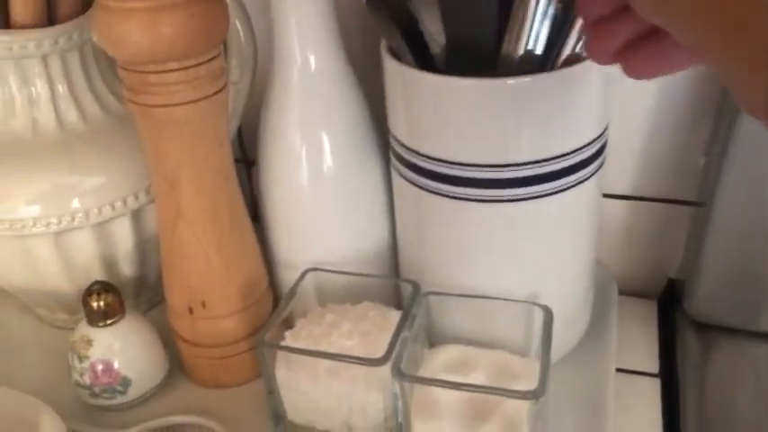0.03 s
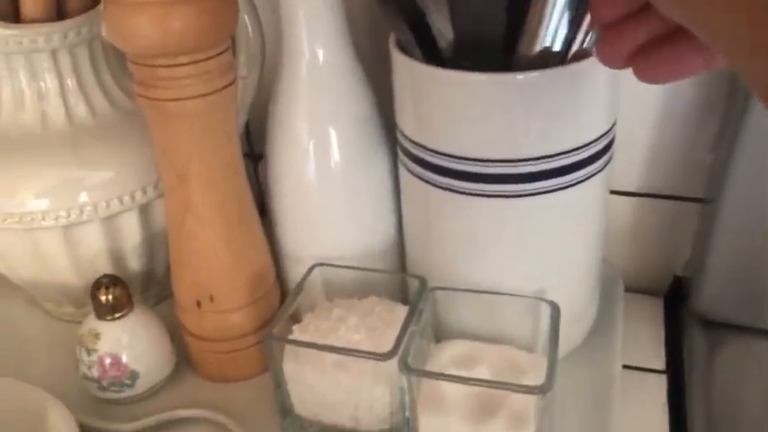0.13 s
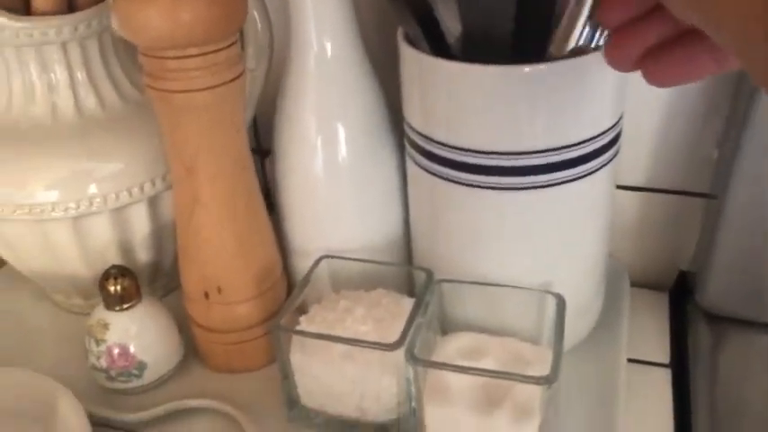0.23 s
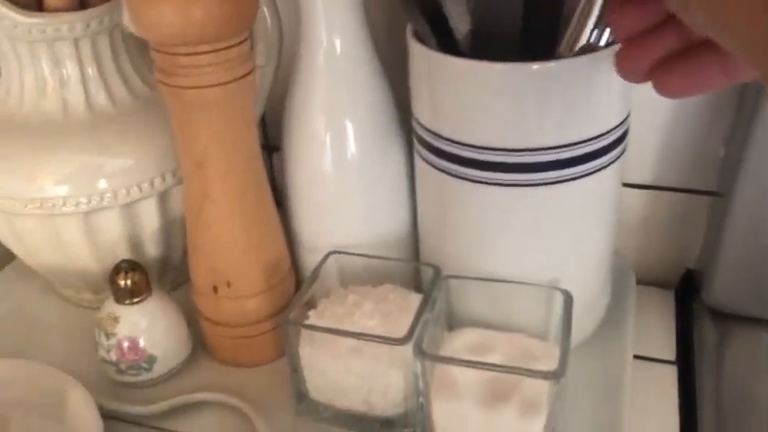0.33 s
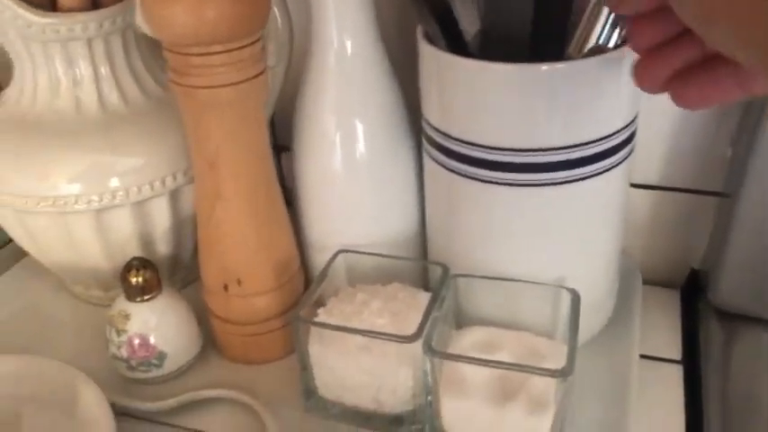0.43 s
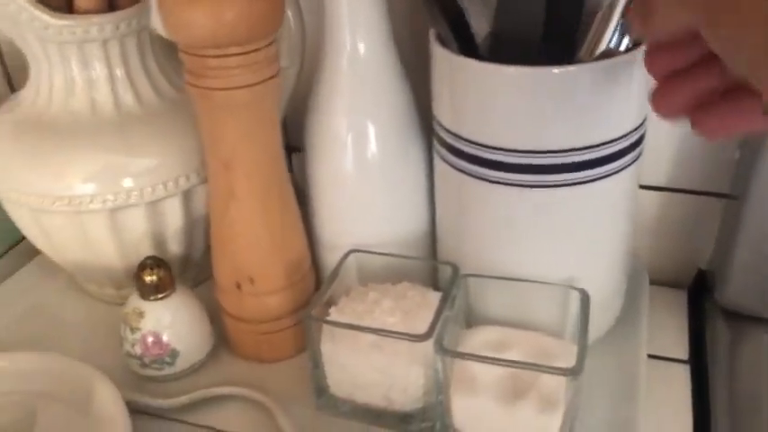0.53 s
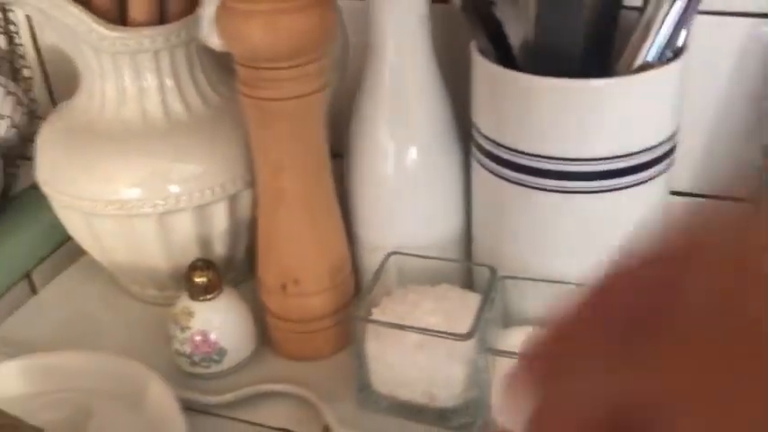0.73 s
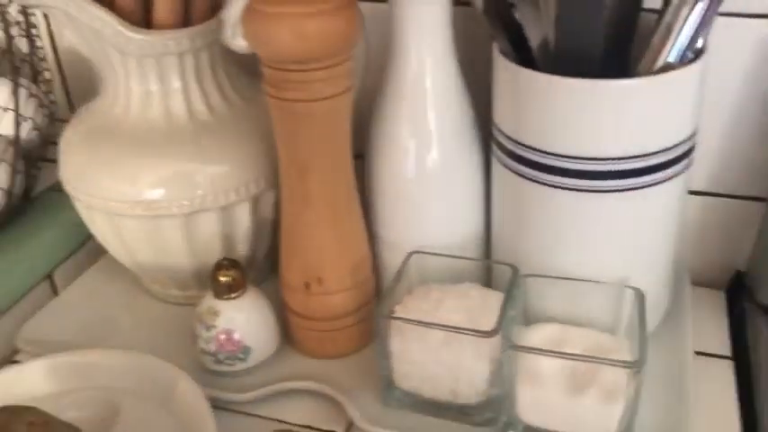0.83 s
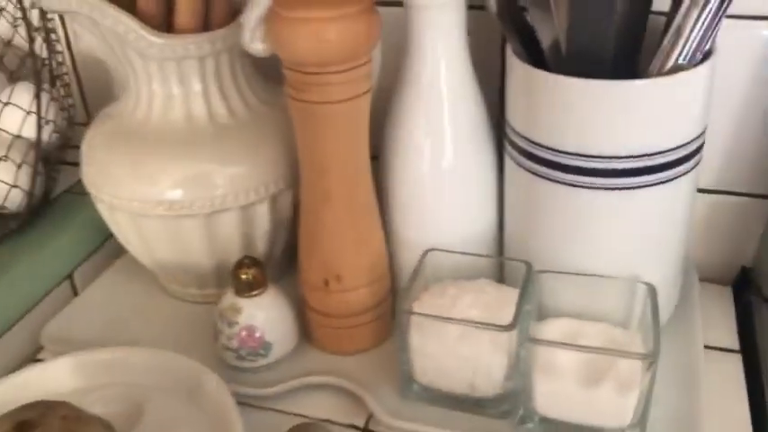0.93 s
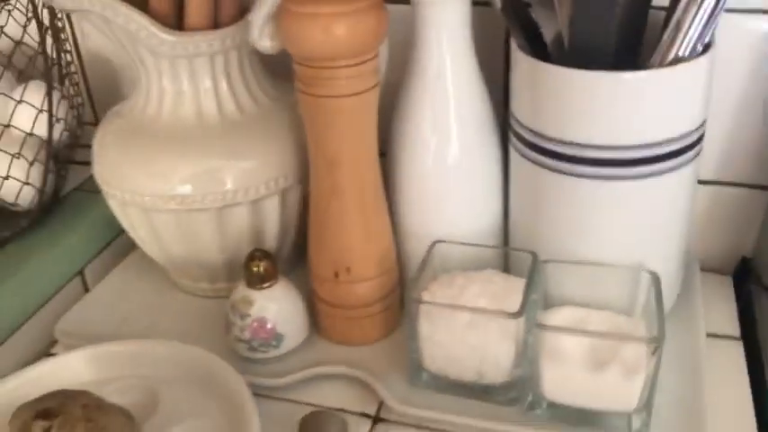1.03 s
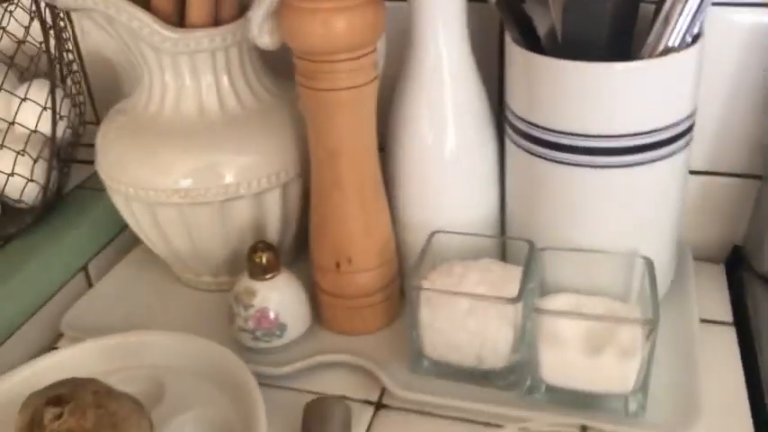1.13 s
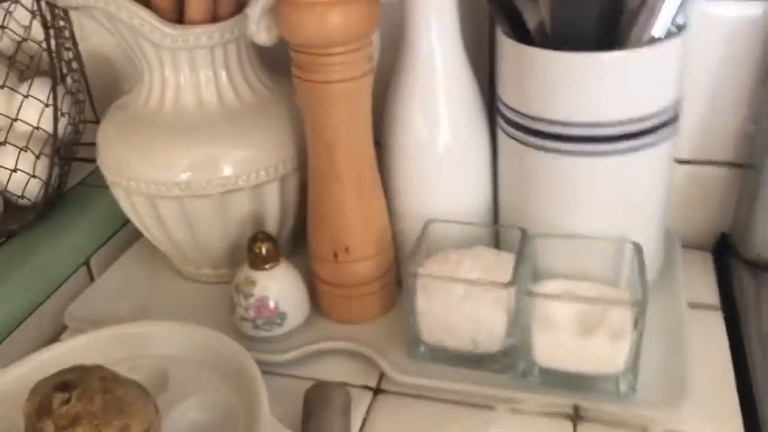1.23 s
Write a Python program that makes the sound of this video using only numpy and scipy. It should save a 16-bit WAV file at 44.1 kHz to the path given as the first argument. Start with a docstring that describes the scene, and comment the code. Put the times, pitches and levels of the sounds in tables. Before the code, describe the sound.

A metal utensil slides and clanks once into a ceramic crock of other utensils.

```python
"""First a metal utensil slides along its neighbours in a ceramic crock on a kitchen counter: the steel
sticks and slips, hissing and squeaking. At 0.22 seconds it drops against them in one clank of several
quick contacts that ring the steel and the crock, and the small kitchen echoes briefly. From about
0.7 seconds a tiny tick and faint handling rustles follow. A low room rumble lies under it all."""
import sys
import numpy as np
from scipy import signal
from scipy.fft import rfft, irfft
from scipy.io import wavfile
from scipy.ndimage import uniform_filter1d

SR = 44100
rng = np.random.default_rng(int(sys.argv[2]) if len(sys.argv) > 2 else 0)


def generate_wav(sig):
    """Save sig (samples, or channels by samples) to the path in sys.argv[1] as 16-bit PCM at SR."""
    pcm = np.round(np.clip(np.atleast_2d(sig).T, -1, 1) * 32767).astype(np.int16)
    wavfile.write(sys.argv[1], SR, pcm)


N = 57330

# The tone colour of the crowded utensils. Each row: frequency in Hz, relative level in dB.
UTENSIL_COLOUR = [(150, -20), (380, -15), (600, -14.5), (800, -16), (1050, -5.5), (1600, -8.5),
                  (2300, -7.5), (3000, -3), (3500, -7), (4500, -2.5), (5700, 2), (7400, -3), (8200, 6.5),
                  (8800, -1), (10200, 1.5), (11000, -2), (12100, 1), (13300, -4), (15300, -2)]
FIRST_TOUCH_S = .2194  # the slide ends and the clank begins


def clank(t):
    """The utensil drops: it touches the rim, then each contact shakes steel, crock and counter."""
    return rim_touch(t) + crock_and_steel(t) + jangle(t) + counter_thud(t)


def jangle(t):
    """Each contact gives a sharp crack and sets the crowded utensils ringing very briefly."""
    low, high = split(noise(UTENSIL_COLOUR), hz=1700)
    ring = low * ringing(t, fade_s=.092) + high * ringing(t, fade_s=.075)
    crack = noise(UTENSIL_COLOUR) * ringing(t, fade_s=.008)
    return amp(-14) * ring + amp(-12.5) * crack


def crock_and_steel(t):
    """The struck crock and the steel in it ring at their own natural pitches."""
    # The ringing tones. Each row: pitch in Hz, relative level in dB, seconds to fade by 60 dB.
    tones = [(453, -19, .2), (477, -20, .19), (1060, -22, .22), (1410, -20, .12), (2848, -17, .09),
             (4242, -12, .11), (5082, -13, .11), (5530, -5, .095), (5748, -7, .09), (6137, -11, .1),
             (6727, -6, .105), (6943, -12, .09), (7154, -8, .1), (8086, -4, .075), (8229, 1, .095),
             (8299, -6, .08), (8942, -9, .085), (9276, -5, .08), (9433, -3, .09), (9580, -8, .105),
             (10025, -7, .08), (10218, -2, .085), (10650, -9, .09), (11435, -8, .085), (11647, -3, .08),
             (11896, -7, .075), (12183, -2, .07), (12400, -1, .065), (12590, -8, .08), (12808, -9, .075),
             (14010, -7, .08), (14145, -6, .08), (14388, -7, .075), (15020, -7, .08), (15490, -8, .08)]
    phases = rng.uniform(0, 2 * np.pi, len(tones))
    return amp(-24) * sum(amp(db) * ringing(t, fade_s) * np.sin(2 * np.pi * hz * t + phase)
                          for (hz, db, fade_s), phase in zip(tones, phases))


def rim_touch(t):
    """The first touch on the rim: a pitched clack, quickly choked, over a knock of the crock wall."""
    # The tone colour of the crock wall. Each row: frequency in Hz, relative level in dB.
    knock_colour = [(300, -19.5), (600, -3), (1100, 0.5), (1500, -6.5), (2100, -5), (3000, -16),
                    (6000, -30)]
    clack_hz, clack_length_s = 2902, .0052
    age = t - FIRST_TOUCH_S
    swell = np.sin(np.pi * np.clip(age / clack_length_s, 0, 1))
    clack = swell * np.sin(2 * np.pi * clack_hz * age)
    knock = noise(knock_colour) * fade(age, fade_s=.035)
    return amp(-13.5) * clack + amp(-24) * knock


def counter_thud(t):
    """The counter under the crock answers each contact with a dull thud."""
    # The tone colour of the counter. Each row: frequency in Hz, relative level in dB.
    thud_colour = [(60, -15.5), (110, 1.5), (220, -0.5), (400, -9.5), (800, -28.5)]
    return amp(-47.5) * noise(thud_colour) * ringing(t, fade_s=.1)


def ringing(t, fade_s):
    """The strength of a ring that gains energy from every contact and loses it steadily."""
    # The contacts within the clank. Each row: start in seconds, relative level in dB.
    contacts = [(0.2197, -6.5), (0.2212, -3.5), (0.2236, 1.5), (0.2264, -7.5), (0.2302, -7), (0.2336, -4.5),
                (0.2398, -9.5), (0.2465, -11), (0.2502, -13), (0.2690, -21.5)]
    return np.sqrt(sum((amp(db) * fade(t - start, fade_s)) ** 2 for start, db in contacts))


def slide(t):
    """Steel sticks and slips on steel; the slips ring the held utensil and hiss."""
    # How hard the utensil presses, heard as loudness. Each row: time in seconds, level in dB.
    pressure = [(0, -57.5), (.02, -66.5), (.064, -60.5), (.076, -53.5), (.105, -47.5), (.156, -48.5),
                (.18, -56), (0.195, -62.5), (.218, -60)]
    # Where the held utensil rings. Each row: pitch in Hz, width in Hz, relative level in dB.
    utensil_peaks = [(2170, 140, -15), (2900, 150, -10), (4140, 80, -13), (5070, 60, -13),
                     (5640, 82, -11.5), (6650, 80, -10), (8220, 90, -3.5), (8700, 90, -7), (10150, 200, -7),
                     (11700, 90, -7.5), (14130, 80, -7)]
    slips_per_second, slip_spread_db = 1100, 3
    slips = (rng.random(N) < slips_per_second / SR) * rng.choice([-1, 1], N)
    slips = slips * amp(slip_spread_db * rng.standard_normal(N))
    hiss = noise(UTENSIL_COLOUR) * amp(-3.5 + 2.5 * flutter(samples=130))
    times, levels_db = np.array(pressure).T
    loudness = amp(np.interp(t, times, levels_db)) * (t < FIRST_TOUCH_S)
    return unit(resonate(slips, utensil_peaks, t) + hiss) * loudness


def squeaks(t):
    """The sliding steel locks onto one pitch for a moment and gives an unsteady squeak."""
    # The squeaks. Each row: middle in seconds, half length in seconds, pitch in Hz, level in dB.
    squeak_list = [(.002, .006, 5750, -57), (.074, 0.0037, 5670, -52), (.105, 0.0021, 5750, -48),
                   (.129, 0.0057, 8190, -47.5), (.155, 0.0076, 8470, -43.5), (.175, .005, 8182, -48),
                   (.174, .015, 14130, -53.5), (.187, 0.021, 9630, -58)]
    sound = np.zeros(N)
    for middle, half_length, hz, db in squeak_list:
        swell = np.exp(-((t - middle) / half_length) ** 2)
        sound += amp(db) * swell * np.sin(2 * np.pi * hz * t + .6 * flutter(samples=200))
    return sound


def kitchen_echo(sound, t):
    """The small kitchen returns a short wash of echoes; the air takes the highest treble soonest."""
    # The tone colour of the echo. Each row: frequency in Hz, relative level in dB.
    echo_colour = [(200, -0.5), (400, 6), (750, 7), (1300, 3.5), (2300, -0.5), (2950, -7), (3800, 0.5),
                   (5500, -5), (8000, -7), (15000, -10.5)]
    build_up_s = .032
    low, rest = split(noise(echo_colour), hz=3800)
    high, top = split(rest, hz=8500)
    tail = low * fade(t, fade_s=.34) + high * fade(t, fade_s=.29) + top * fade(t, fade_s=.23)
    tail *= np.minimum(t / build_up_s, 1)
    return amp(-21) * signal.fftconvolve(sound, tail / np.linalg.norm(tail))[:N]


def handling(t):
    """Handling makes one tiny tick, then soft rustles that ring a little."""
    # The rustles. Each row: start in seconds, level in dB, then seconds to rise, hold and fade by 60 dB.
    rustles = [(0.814, -74.5, .01, 0.039, 0.41), (0.912, -71.5, .015, 0.01193, 0.1974),
               (1.038, -72.5, .02, 0.068, .3), (1.138, -59.5, .008, 0.048, 0.43)]
    # Where the rustle rings. Each row: pitch in Hz, width in Hz, relative level in dB.
    rustle_peaks = [(1720, 62, -0.5), (2705, 72, -3.5), (3350, 140, 1), (4400, 230, -2)]
    # The tone colours of rustle and tick. Each row: frequency in Hz, relative level in dB.
    rustle_colour = [(400, -22), (1200, -0.5), (3000, -3.5), (5800, -6.5), (7200, -10), (8200, -8),
                     (9500, -16), (10600, -11), (12000, -19), (13200, -13), (15000, -25)]
    tick_colour = [(1500, -12), (3000, 4), (7000, 0), (12000, -8), (15000, -14)]
    tick_s = .7275
    tick = amp(-59.5) * noise(tick_colour) * fade(t - tick_s, fade_s=.0066)
    swell = np.zeros(N)
    for start, db, rise_s, hold_s, fade_s in rustles:
        rise = np.clip((t - start) / rise_s, 0, 1)
        fall = fade(np.maximum(t - start - rise_s - hold_s, 0), fade_s)
        swell += amp(db) * rise * fall
    ring = resonate(rng.standard_normal(N), rustle_peaks, t)
    rub = unit(noise(rustle_colour) + amp(-6) * ring)
    return tick + rub * swell


def room_tone(t):
    """The room rumbles low, with a faint, wavering hum."""
    # The tone colour of the rumble. Each row: frequency in Hz, relative level in dB.
    rumble_colour = [(15, -44.5), (25, -18.5), (48, -5), (114, 1.5), (157, -8.5), (190, -0.5), (309, -14),
                     (373, -12.5), (405, -21.5), (531, -12.5), (714, -19.5), (1130, -22), (2910, -39.5),
                     (14400, -49.5), (16000, -54.5)]
    # The tones of the hum. Each row: pitch in Hz, level in dB.
    hum_tones = [(120, -65), (190, -65), (380, -67)]
    hum = sum(amp(db) * np.sqrt(2) * np.sin(2 * np.pi * hz * t + flutter(samples=6000))
              for hz, db in hum_tones)
    return amp(-51.5) * noise(rumble_colour) + hum


def amp(db):
    """Turn decibels into a number to multiply by."""
    return 10 ** (np.asarray(db) / 20)


def unit(sound):
    """Scale a sound to an average strength (root mean square) of 1."""
    return sound / np.sqrt(np.mean(sound ** 2))


def noise(colour):
    """Noise of strength 1 with the given tone colour."""
    hz, db = np.array(colour, float).T
    frequencies = np.maximum(np.arange(N // 2 + 1) * SR / N, 1)
    gain = amp(np.interp(np.log(frequencies), np.log(hz), db))
    return unit(irfft(rfft(rng.standard_normal(N)) * gain, N))


def fade(age, fade_s):
    """Jump to 1 at age 0, then fall by 60 dB every fade_s seconds."""
    return (age >= 0) * np.exp(-np.log(1000) * np.maximum(age, 0) / fade_s)


def split(sound, hz):
    """The parts of a sound below and above a frequency."""
    frequencies = np.arange(N // 2 + 1) * SR / N
    low = irfft(rfft(sound) / (1 + (frequencies / hz) ** 4), N)
    return low, sound - low


def flutter(samples):
    """A random wobble of strength 1; smoothing over more samples makes it slower."""
    return unit(uniform_filter1d(rng.standard_normal(N), samples))


def resonate(push, peaks, t):
    """An object rings at its own pitches when pushed; wider peaks die away sooner."""
    ring = sum(amp(db) * np.sqrt(width) * np.exp(-np.pi * width * t) * np.sin(2 * np.pi * hz * t)
               for hz, width, db in peaks)
    return unit(signal.fftconvolve(push, ring)[:N])


def scene():
    """The utensil in its crock, its echo, the handling and the room tone, in one channel."""
    t = np.arange(N) / SR
    utensil = slide(t) + squeaks(t) + clank(t)
    return (utensil + kitchen_echo(utensil, t) + handling(t) + room_tone(t))[None]


def record(dry):
    """Cut off the very highest treble."""
    top_hz = 15750
    return signal.sosfilt(signal.ellip(10, .2, 80, top_hz, fs=SR, output="sos"), dry)


dry = scene()
out = record(dry)
generate_wav(out)
```